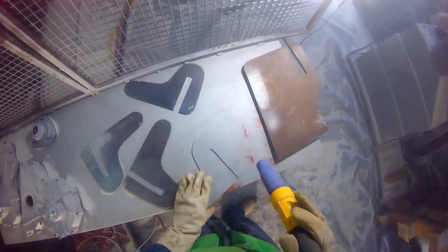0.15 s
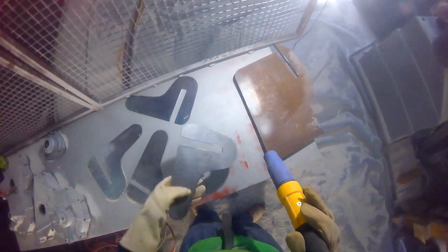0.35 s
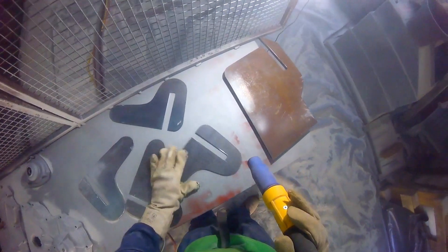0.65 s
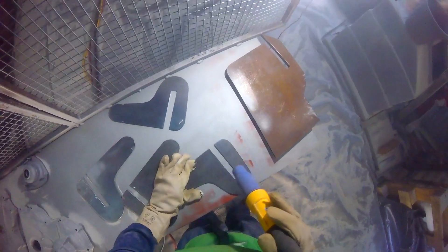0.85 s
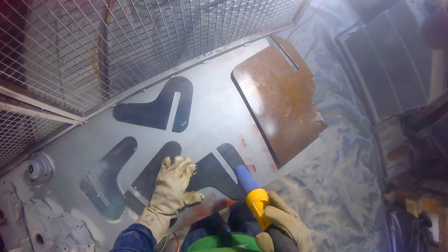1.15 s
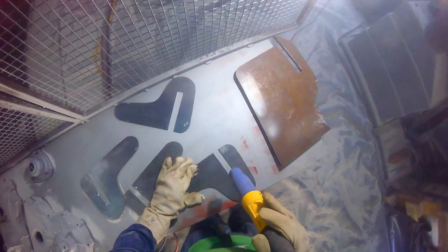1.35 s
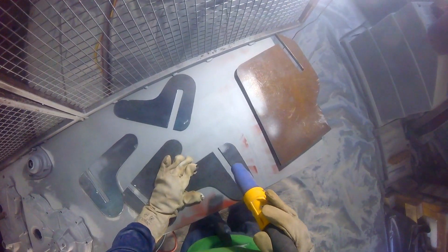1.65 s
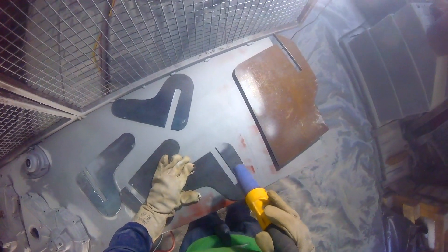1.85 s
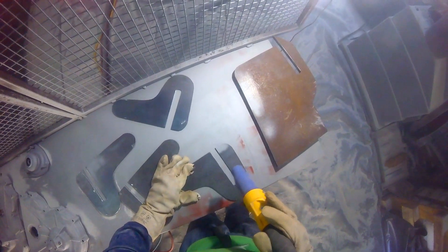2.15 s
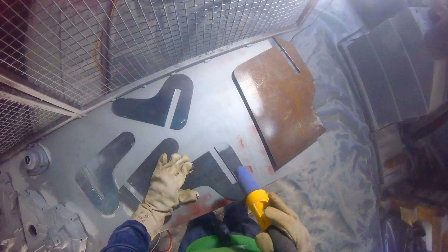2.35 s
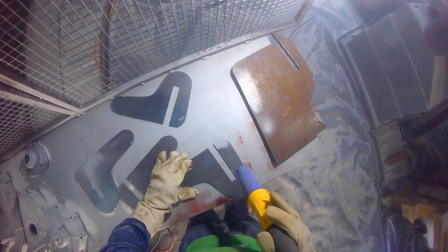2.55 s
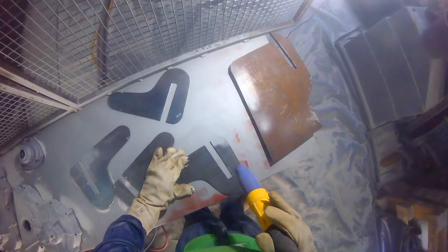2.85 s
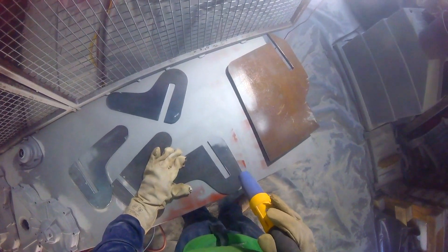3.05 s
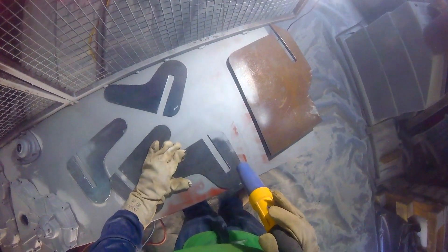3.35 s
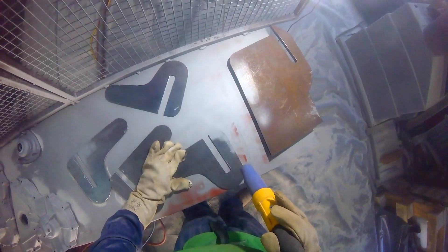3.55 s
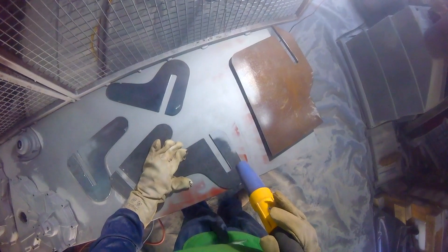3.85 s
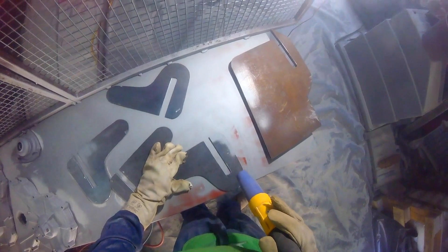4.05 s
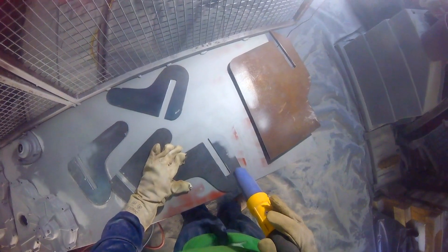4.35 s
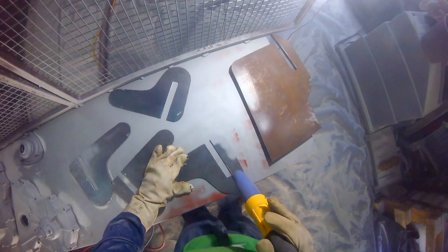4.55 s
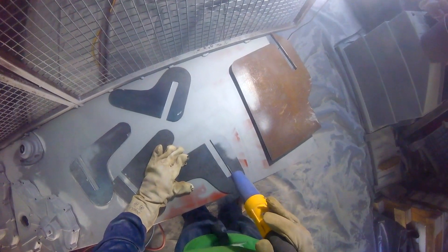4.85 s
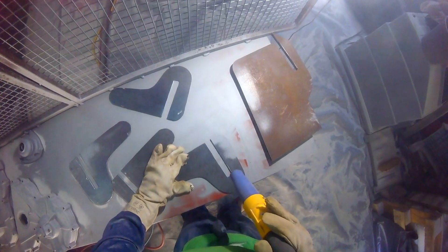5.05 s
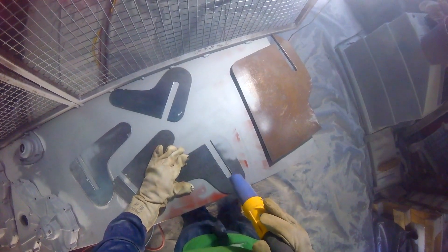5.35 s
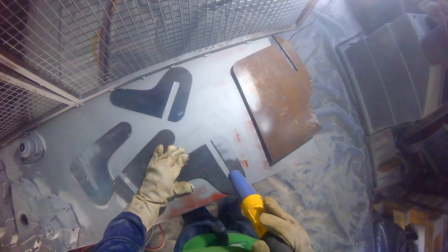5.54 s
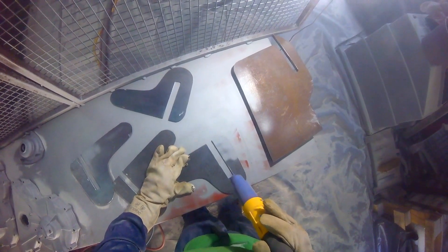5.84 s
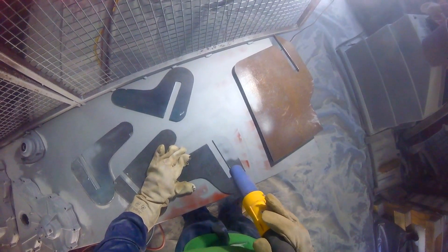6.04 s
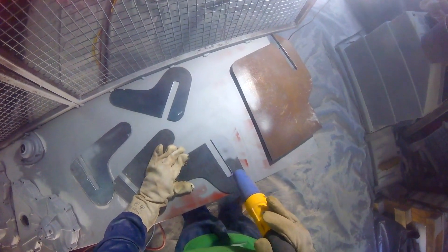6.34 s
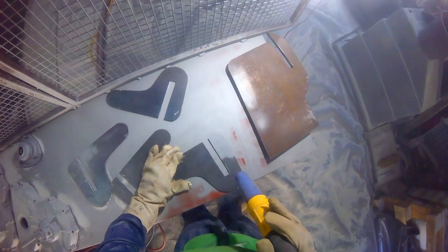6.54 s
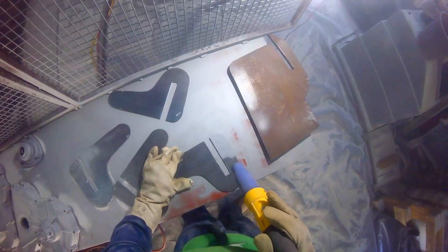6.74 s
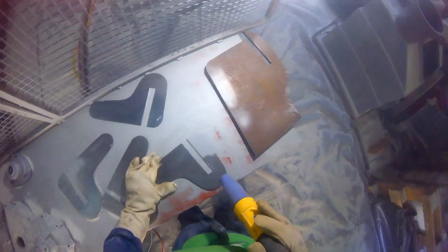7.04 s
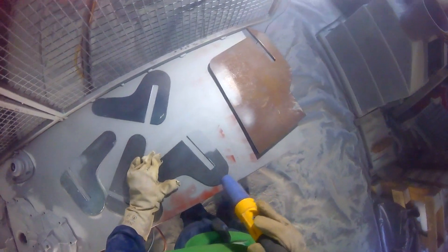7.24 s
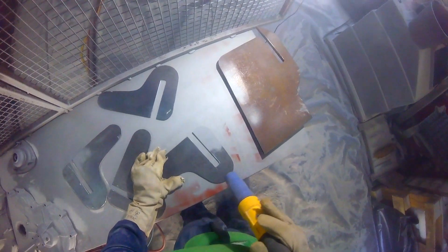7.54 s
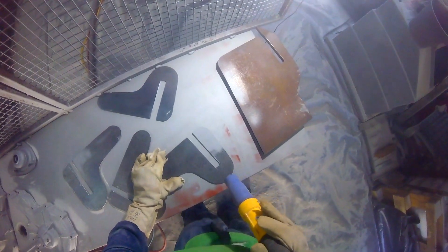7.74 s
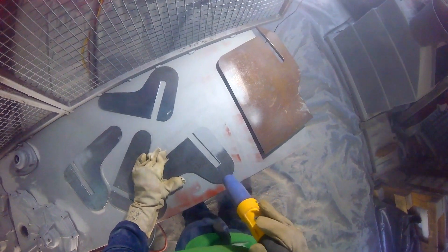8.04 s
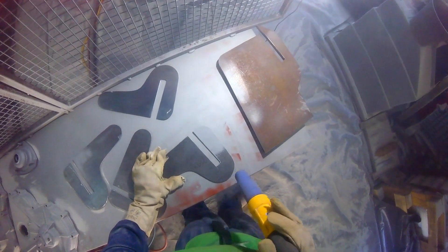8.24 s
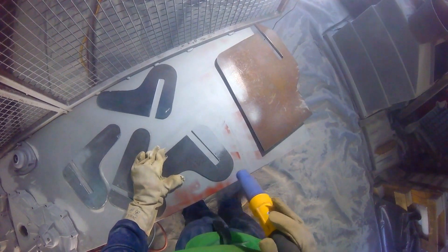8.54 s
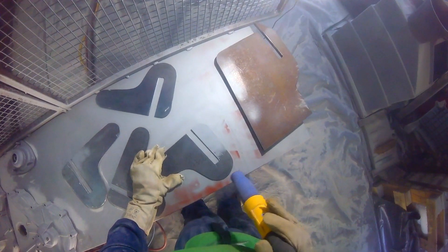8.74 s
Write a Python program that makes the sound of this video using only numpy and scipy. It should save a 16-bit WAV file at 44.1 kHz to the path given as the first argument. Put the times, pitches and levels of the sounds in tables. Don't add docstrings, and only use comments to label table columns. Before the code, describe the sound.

A sandblasting nozzle roars and hisses steadily on steel, grit sizzling in quick surges, after a brief scrape and clacking thuds of a metal part.

```python
import sys
import numpy as np
from scipy import signal
from scipy.fft import rfft, irfft, dct
from scipy.io import wavfile
from scipy.ndimage import uniform_filter1d

SR = 44100
rng = np.random.default_rng(int(sys.argv[2]) if len(sys.argv) > 2 else 0)


def inscribe(sig):
    pcm = np.round(np.clip(np.atleast_2d(sig).T, -1, 1) * 32767)
    wavfile.write(sys.argv[1], SR, pcm.astype(np.int16))


def boost_factor(decibels):
    exponent = np.asarray(decibels, float) / 20
    return 10 ** exponent


N = 392049
FRAME, HOP = 1024, 256
BIN_HZ = np.fft.rfftfreq(FRAME, 1 / SR)[:, None]
FRAME_S = np.arange(N // HOP + 6) * HOP / SR

# t/s, level/dB about usual
JET = [(0.0, -1.2), (0.29, -2.8), (0.97, 0.05), (1.37, 0.2), (3.47, 1.46), (3.87, 0.5), (4.01, 0.5),
       (4.39, -0.4), (4.53, 1.6), (4.81, -0.25), (5.99, -1.2), (6.13, -1.5), (6.57, 0.3), (6.75, -1.7),
       (7.07, 0.4), (7.29, -2.5), (7.85, -0.2), (8.89, 1.1)]
# t/s, level/dB about usual
FEED = [(0.0, -3.5), (0.63, -2), (0.79, 2), (1.25, 0), (1.47, 0.5), (1.71, -1.8), (2.69, -1.3), (4.09, 0.5),
        (4.31, -1), (4.51, 1), (5.77, 0.3), (6.35, 1.5), (6.47, -0.7), (6.91, 1.3), (7.27, -1.5),
        (8.01, 0.6), (8.17, -0.8), (8.89, -0.3)]
# t/s, level/dB about usual
SPRAY = [(0.0, 0.5), (0.57, -3.5), (0.79, 1), (0.99, 0.2), (1.41, 3.5), (2.51, 1.5), (3.07, -3.5),
         (3.27, -2), (3.51, -3), (4.07, 0.5), (4.25, -1.5), (4.51, -0.4), (5.75, -2), (6.75, -0.1),
         (7.67, 0.5), (7.89, 1.9), (8.67, -2.7), (8.89, 4.5)]
# f/Hz, level/dB per Hz
ROAR_COLOUR = [(15, -46), (25, -16), (64, 15), (97, -16.5), (199, -8), (231, -4.5), (268, -9.5),
               (305, -7.5), (459, -5), (665, -7), (801, -2.5), (964, -5.5), (1230, -12.5), (1710, -13),
               (2100, -17), (2730, -44), (4620, -120)]
# f/Hz, width/Hz, lift/dB
BENCH_MODES = [(383, 74, 3), (460, 53, 3), (535, 41, 5.5), (725, 26, 4), (804, 29, 1.8), (895, 46, 4),
               (973, 38, 5), (1075, 21, 3), (1150, 21, 3.5), (1215, 11, -3), (1331, 18, 4), (1690, 40, 6.5)]
# f/Hz, level/dB per Hz
HISS_COLOUR = [(2100, -16), (2450, -13.5), (2800, -4.5), (3150, -10), (3400, -8.5), (3660, -14.5),
               (3920, -7.5), (4180, -0.5), (4450, -8.5), (4720, 2), (5000, -1.5), (5300, -9.5),
               (5680, -9.5), (5950, -14.5)]
# f/Hz, level/dB per Hz
SIZZLE_COLOUR = [(6000, -13), (6250, -10), (6500, 0.5), (6750, 0), (7200, -2), (7550, -7), (7970, -16),
                 (8250, -26)]
# f/Hz, level/dB per Hz
FINE_COLOUR = [(8250, -28.5), (8600, -18), (9000, -23.5), (9600, -28.5), (9950, -34.5), (10050, -33),
               (10400, -39), (10650, -37), (11750, -47.5), (12000, -45), (12600, -46), (13050, -43),
               (13500, -56), (13900, -62)]
# t/s, length/s, scrape level/dB, boom level/dB re scrape
STROKES = [
    (0.0, 0.064, -31.5, -16),
    (.13, .17, -27.5, -1.5),
    (0.384, 0.1, -27.5, 2),
    (0.55, 0.068, -19, -3),
    (.68, 0.14, -30, -1),
    (.86, .16, -28.5, -7),
]
# f/Hz, level/dB per Hz
DRAG_COLOUR = [(70, -6), (130, 4), (200, -1), (300, -0.5), (480, 3), (580, -16), (800, -18)]
# t/s, peak level/dB, f/Hz, t60/s, clack level/dB re boom
KNOCKS = [
    (0.143, -29, 112, 0.18, -15),
    (0.335, -28, 127, 0.1, -13),
    (0.378, -25, 120, 0.18, -6),
    (0.425, -21, 92.5, 0.18, -16),
    (0.446, -21.5, 131, 0.16, -7),
    (0.494, -24, 83, 0.26, -19),
    (0.551, -20, 111, 0.16, -9),
    (0.576, -18, 118, 0.16, -20),
    (0.689, -31, 159, 0.15, -9),
]
# f/Hz, level/dB
CLACK_MODES = [(230, -18), (290, 5.5), (370, 2), (480, 1), (690, -14)]
# f/Hz, level/dB rms
HUM_LINES = [(64.4, -46), (126.5, -52.5), (85.8, -55)]
# f/Hz, level/dB over the mean line level
LINE_STEP = [(6000, -15.5), (7500, -4), (8600, 3), (9500, 4.5), (10500, 7), (11700, 6.5), (12600, 5.5),
             (13200, 11.5), (13600, 11)]


def evened(x):
    return x / np.sqrt(np.mean(x ** 2) + 1e-20)


def drift(low_hz, high_hz):
    rate_hz, turn = rng.uniform(low_hz, high_hz, 30), rng.random(30)
    phase = 2 * np.pi * (rate_hz[:, None] * FRAME_S + turn[:, None])
    return evened(np.sin(phase).sum(0))


def layer(usual_db, jet, feed, spray, wander_db):
    level_db = usual_db + wander_db * drift(1.257, 5.0)
    for share, control in ((jet, JET), (feed, FEED), (spray, SPRAY)):
        t_s, control_db = np.transpose(control)
        level_db = level_db + share * np.interp(FRAME_S, t_s, control_db)
    return level_db


def band(colour, low_hz, high_hz, level_db):
    f_hz, db = np.transpose(colour)
    inside = (BIN_HZ >= low_hz) & (BIN_HZ < high_hz)
    shape = boost_factor(np.interp(np.log(BIN_HZ + 1), np.log(f_hz + 1), db)) * inside
    return shape / np.sqrt(np.sum(shape ** 2) / len(BIN_HZ)) * boost_factor(level_db)


def shaped(drive, magnitude, patchy_db):
    z = signal.stft(np.resize(drive, N + FRAME), nperseg=FRAME, noverlap=FRAME - HOP)[2]
    patches = rng.standard_normal(magnitude.shape)
    patches = uniform_filter1d(patches, size=8, axis=0)
    patches = evened(uniform_filter1d(patches, size=7, axis=1))
    gain = magnitude * boost_factor(patchy_db * patches)
    z = z * gain[:, :z.shape[1]]
    return signal.istft(z, nperseg=FRAME, noverlap=FRAME - HOP)[1][:N]


def roar(surge):
    flutter_db = 0.49 * surge + 0.5 * drift(5.0, 13.0)
    body_db = layer(-29, jet=1.3, feed=0.1, spray=0.2, wander_db=0.36) + flutter_db
    flank_db = layer(-32, jet=1.3, feed=-0.33, spray=0.05, wander_db=-1.2) + flutter_db
    wash_db = layer(-35, jet=0.25, feed=0.2, spray=0.27, wander_db=0.97)
    rumble_db = layer(-44, jet=1.2, feed=-0.2, spray=0.4, wander_db=1)
    magnitude = band(ROAR_COLOUR, 28, 75, rumble_db - 2)
    magnitude = magnitude + band(ROAR_COLOUR, 75, 220, rumble_db)
    magnitude = magnitude + band(ROAR_COLOUR, 220, 600, wash_db)
    magnitude = magnitude + band(ROAR_COLOUR, 600, 1100, body_db)
    magnitude = magnitude + band(ROAR_COLOUR, 1100, 2100, flank_db)
    x = shaped(rng.standard_normal(N), magnitude, patchy_db=1.2)
    hz = np.fft.rfftfreq(N, 1 / SR)
    lift_db = -1.14 * (hz > 200) - 10.0 * (hz < 34)
    for f_hz, width_hz, mode_db in BENCH_MODES:
        lift_db = lift_db + mode_db / (1 + (2 * (hz - f_hz) / width_hz) ** 4)
    return irfft(rfft(x) * boost_factor(lift_db), N)


def hiss(surge):
    flutter_db = 0.46 * surge
    low_db = layer(-28, jet=0.68, feed=-0.22, spray=0.05, wander_db=-0.1) + flutter_db
    mid_db = layer(-28, jet=0.6, feed=0.14, spray=0.16, wander_db=0.32) + flutter_db
    high_db = layer(-24.5, jet=0.4, feed=-0.18, spray=0.18, wander_db=0.03) + flutter_db
    magnitude = band(HISS_COLOUR, 2100, 3650, low_db)
    magnitude = magnitude + band(HISS_COLOUR, 3650, 4500, mid_db)
    magnitude = magnitude + band(HISS_COLOUR, 4500, 6000, high_db)
    return shaped(rng.standard_normal(N), magnitude, patchy_db=1.5)


def grit(surge):
    sputter = drift(11.0, 20.0)
    flutter_db = 0.59 * surge + 0.65 * sputter
    sizzle_db = layer(-22, jet=0.28, feed=1.12, spray=0.07, wander_db=0.23) + flutter_db
    fine_db = layer(-40.5, jet=-0.13, feed=0.77, spray=0.75, wander_db=0.5) + flutter_db
    fine_db = fine_db + 0.9 * drift(5.4, 14.0)
    finest_db = layer(-62.5, jet=0, feed=0, spray=0.5, wander_db=0.4) + flutter_db - 0.4 * sputter
    magnitude = band(SIZZLE_COLOUR, 6000, 8250, sizzle_db)
    magnitude = magnitude + band(FINE_COLOUR, 8250, 11500, fine_db)
    magnitude = magnitude + band(FINE_COLOUR, 11500, 13900, finest_db)
    impacts_per_s = 25000
    size = boost_factor(1.1 * np.minimum(rng.exponential(1, N), 6))
    hits = rng.standard_normal(N) * size * (rng.random(N) < impacts_per_s / SR)
    return shaped(evened(hits), magnitude, patchy_db=1.47)


def steel_part_drag():
    edge_db = -7
    magnitude = 0
    for start_s, length_s, scrape_db, boom_db in STROKES:
        from_middle = abs(2 * (FRAME_S - start_s) / length_s - 1)
        drag_db = scrape_db - 5.0 + edge_db * from_middle
        magnitude = magnitude + band(DRAG_COLOUR, 70, 200, drag_db + boom_db - 3.5)
        magnitude = magnitude + band(DRAG_COLOUR, 200, 800, drag_db)
    return shaped(rng.standard_normal(N), magnitude, patchy_db=2.5)


def steel_part_knocks():
    out = np.zeros(N)
    t = np.arange(SR // 4) / SR
    clack = sum(boost_factor(db) * np.sin(2 * np.pi * hz * t) for hz, db in CLACK_MODES)
    attack = 1 - np.exp(-t / 0.004)
    for start_s, peak_db, boom_hz, t60_s, clack_db in KNOCKS:
        envelope = boost_factor(peak_db + 2.5 - 60 * t / max(t60_s, 0.05)) * attack
        boom = np.sin(2 * np.pi * boom_hz * t)
        out[round(start_s * SR):][:len(t)] += envelope * (boom + boost_factor(clack_db) * clack)
    return out


def extractor():
    t, out = np.arange(N) / SR, np.zeros(N)
    for hz, rms_db in HUM_LINES:
        pitch_hz = hz + 0.38 * np.interp(t, FRAME_S, drift(0.19, 3.0))
        level = boost_factor(rms_db + 1.8 * np.interp(t, FRAME_S, drift(0.3, 6.0)))
        out += np.sqrt(2) * level * np.sin(2 * np.pi * np.cumsum(pitch_hz) / SR)
    return out


def workshop(x):
    t60_s, gap_s, taps_per_s = 0.082, 0.003, 2000
    t = np.arange(SR // 4) / SR
    sign = rng.choice([-1., 1.], len(t))
    taps = sign * (rng.random(len(t)) < taps_per_s / SR) * (t > gap_s)
    response = evened(taps * boost_factor(-60 * t / t60_s)) / np.sqrt(len(t))
    return signal.oaconvolve(x, response)[:N]


def scene():
    surge = drift(4.0, 14.0)
    air = roar(surge) + hiss(surge)
    air = boost_factor(-0.39) * air + boost_factor(-13.5) * workshop(air)
    part = steel_part_drag() + steel_part_knocks()
    return (air + grit(surge) + part + extractor())[None]


def line_rounding(x):
    size = 1024
    settle_s, early_db, late_db = 1.2, 3.0, 10.5
    window = signal.windows.cosine(2 * size)
    padded = np.pad(x, (size, 2 * size))
    frames = np.lib.stride_tricks.sliding_window_view(padded, 2 * size)[::size]
    a, b, c, d = np.split(frames * window, 4, axis=1)
    lines = dct(np.hstack([-c[:, ::-1] - d, a - b[:, ::-1]]), type=4, norm="ortho")
    hz = (np.arange(size) + 0.5) * SR / (2 * size)
    t = np.arange(len(frames)) * size / SR

    mean_power = uniform_filter1d((lines ** 2).mean(0), size=24)
    power_now = abs(uniform_filter1d(lines ** 2, size=48, axis=1))
    wander_db = 1.4 * np.repeat(rng.standard_normal((len(t), size // 16)), 16, axis=1)
    f_hz, db = np.transpose(LINE_STEP)
    step_db = np.interp(hz, f_hz, db, left=-60) + wander_db
    step = np.sqrt(mean_power ** 0.45 * power_now ** 0.55) * boost_factor(step_db) + 1e-12

    low_hz = 8000 + 25 * rng.standard_normal(len(t))
    high_hz = 8490 + 15 * rng.standard_normal(len(t))
    notch = (hz > low_hz[:, None]) & (hz < high_hz[:, None])
    notch_db = np.where(t < settle_s, early_db, late_db)
    step = step * boost_factor(notch * notch_db[:, None])
    lines = step * np.sign(lines) * np.floor(abs(lines) / step + 0.4)

    u, v = np.split(dct(lines, type=4, norm="ortho"), 2, axis=1)
    frames = np.hstack([v, -v[:, ::-1], -u[:, ::-1], -u]) * window
    return (frames[1:, :size] + frames[:-1, size:]).ravel()[:N]


def top_cut(x):
    return signal.sosfilt(signal.butter(12, 13910, fs=SR, output="sos"), x)


def record(dry):
    mix = line_rounding(dry[0])[None]
    return top_cut(mix)


dry = scene()
out = record(dry)
inscribe(out)
```